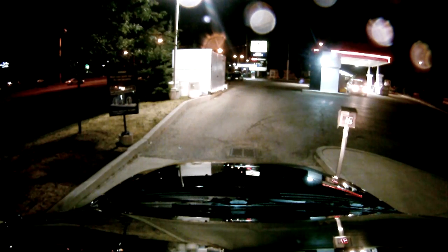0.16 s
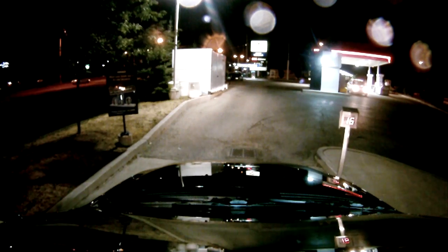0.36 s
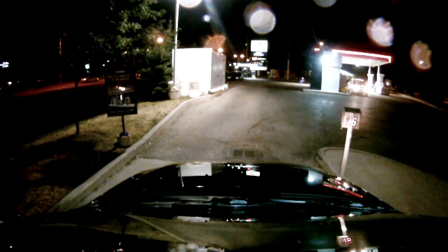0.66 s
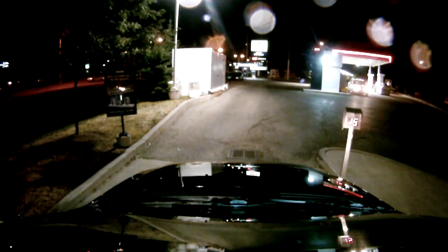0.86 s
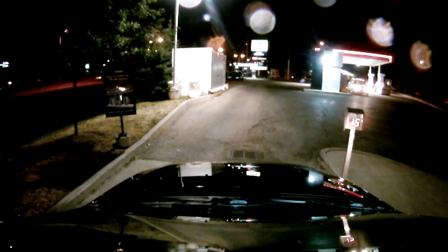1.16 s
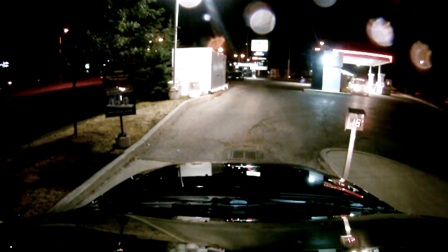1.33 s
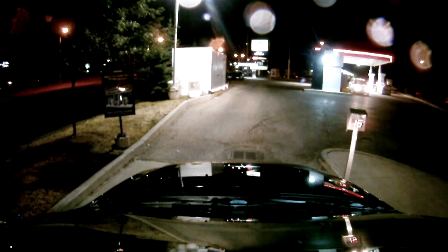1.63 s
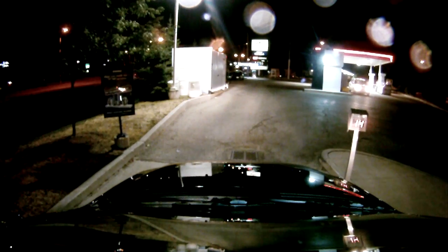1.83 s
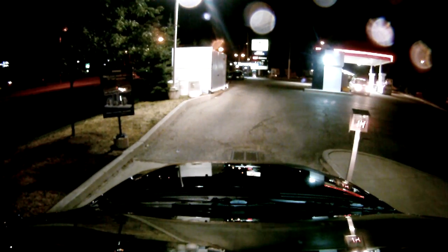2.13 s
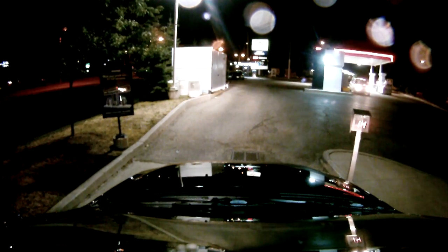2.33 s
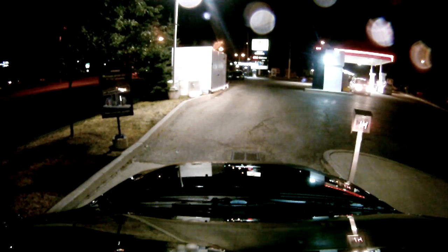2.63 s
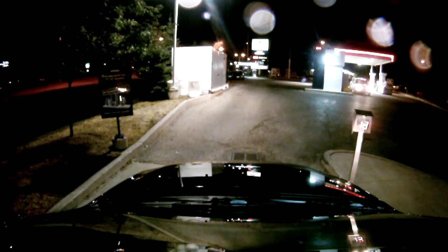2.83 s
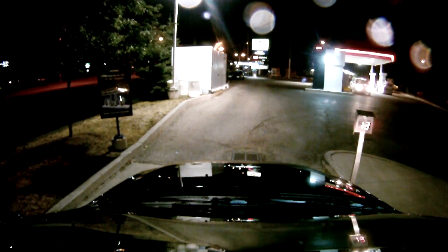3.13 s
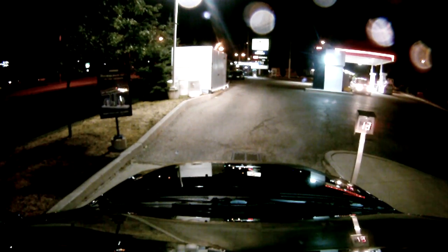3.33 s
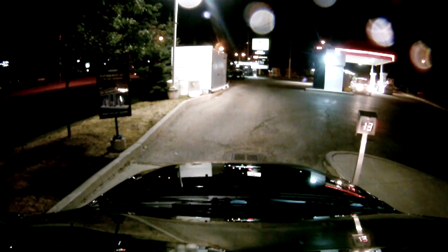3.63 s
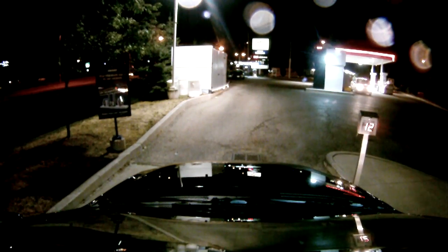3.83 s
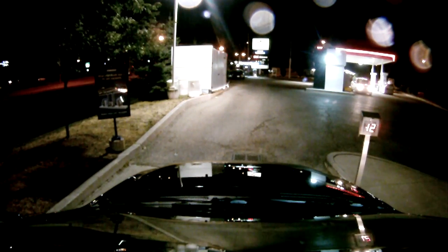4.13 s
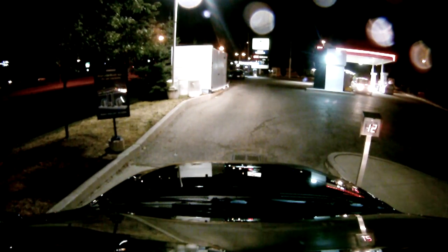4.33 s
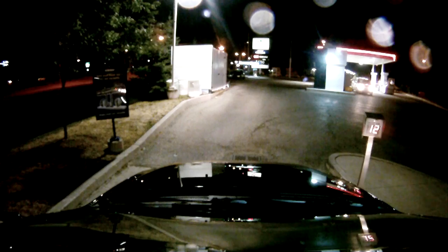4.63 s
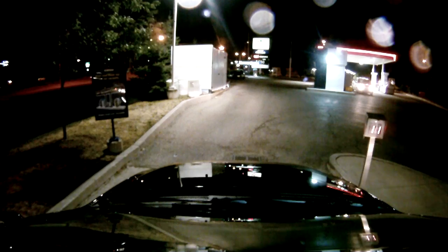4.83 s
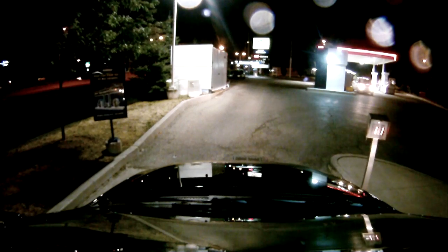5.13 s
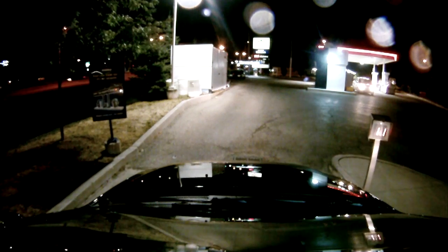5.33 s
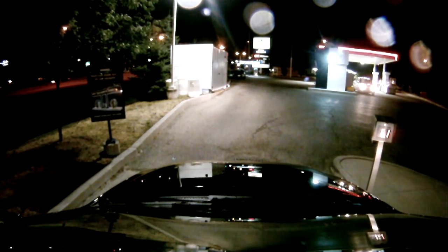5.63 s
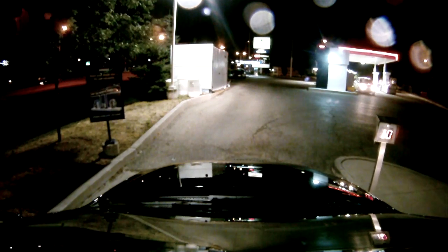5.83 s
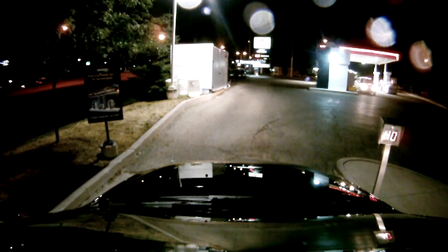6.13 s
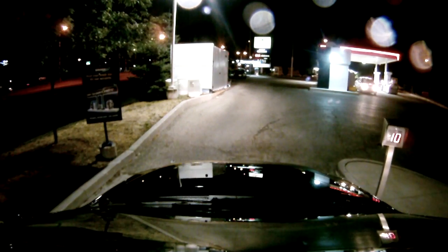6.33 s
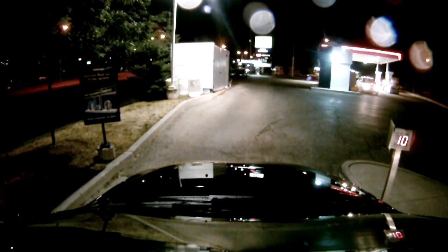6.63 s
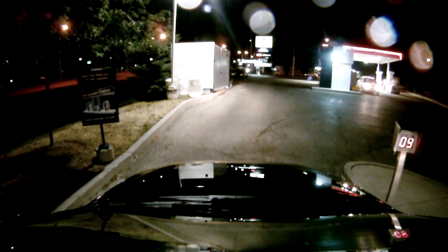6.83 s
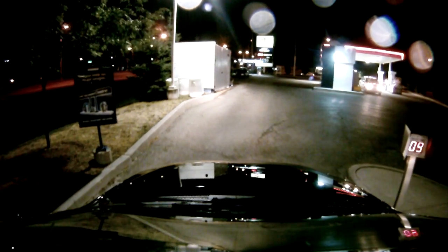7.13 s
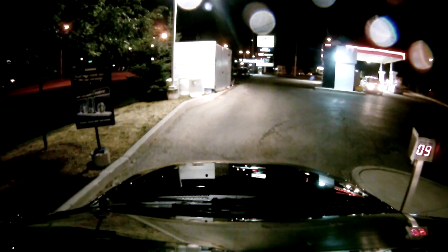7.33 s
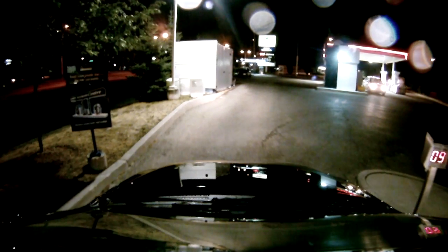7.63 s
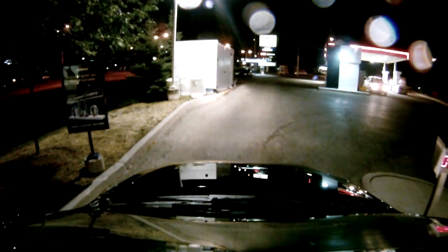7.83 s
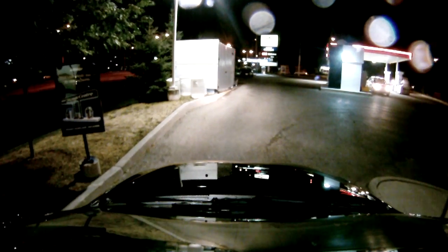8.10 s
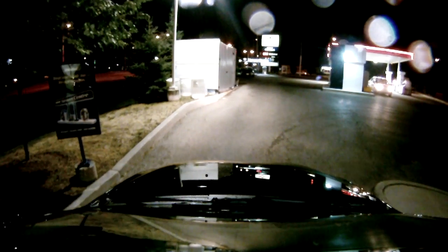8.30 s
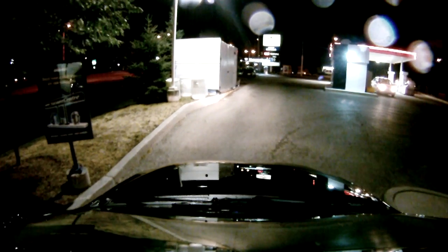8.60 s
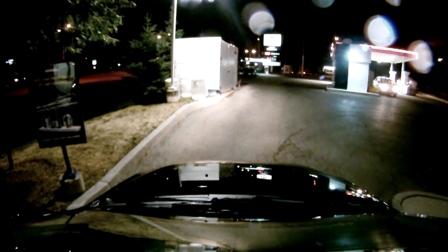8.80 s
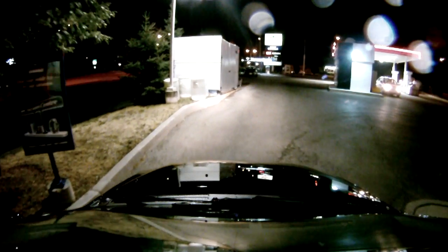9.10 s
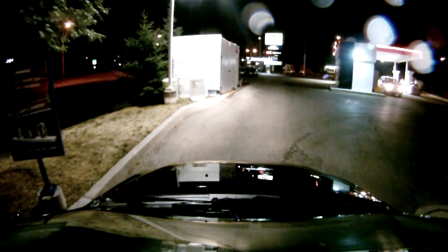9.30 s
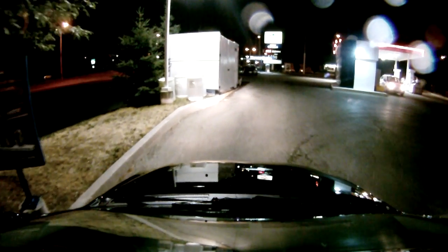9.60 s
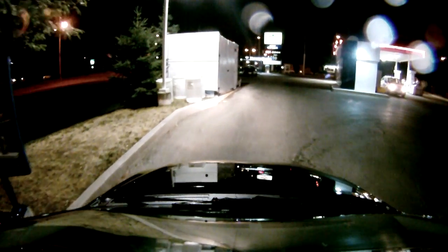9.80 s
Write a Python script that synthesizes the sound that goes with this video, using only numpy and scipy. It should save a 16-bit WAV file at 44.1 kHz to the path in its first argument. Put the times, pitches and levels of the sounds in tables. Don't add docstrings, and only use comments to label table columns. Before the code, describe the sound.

Powerful drying blowers roar with broad hiss and low panel booming as a car creeps out of a wash bay, the roar gradually fading.

```python
import sys
import numpy as np
from scipy import signal
from scipy.fft import rfft, irfft, next_fast_len
from scipy.io import wavfile
from scipy.ndimage import uniform_filter1d

SR = 44100
rng = np.random.default_rng(int(sys.argv[2]) if len(sys.argv) > 2 else 0)


def invert_db(x):
    u = np.asarray(x, float) / 20
    return 10 ** u


def wav_record(signal):
    frames = np.transpose(np.atleast_2d(signal))
    bounded = np.clip(frames, -1, 1)
    quanta = np.round(bounded * 32767).astype(np.int16)
    wavfile.write(sys.argv[1], SR, quanta)


N = 439236
T = np.arange(N) / SR
HZ = np.fft.rfftfreq(next_fast_len(N), 1 / SR)

# [t/s, level/dB]
JET_ROAR = [(0, -25.5), (.3, -26.5), (.5, -24.5), (.7, -26), (1, -26.5), (1.6, -27), (2.4, -27),
            (3.2, -27.5), (4.4, -28), (4.8, -28), (5.6, -28), (6.4, -28), (7.2, -29.5), (8, -30.5),
            (8.5, -31.5), (8.95, -32), (9.45, -36.5), (9.96, -41)]
# [f/Hz, level per Hz/dB]
GROWL_COLOUR = [(30, -26), (100, -12.5), (200, -5.5), (400, -8.5), (700, -5), (1000, -5.5), (1500, -1),
                (1850, 2.5), (2050, -20)]
ROAR_COLOUR = [(1700, -36), (1900, -8.5), (2100, 0), (2400, -3.5), (2700, -9), (2900, -9.5), (3400, -36)]
HISS_COLOUR = [(2000, -49), (2800, -9.5), (3300, 1.5), (4100, -2), (4500, -9), (5000, -42)]
HISS_EDGE_COLOUR = [(3900, -26), (4400, -6), (4800, -1), (5400, -7), (5800, -8.5), (6000, -15.5),
                    (6300, -46)]
# [f/Hz, waver/Hz, level under the growl/dB]
BLADE_TONES = [(586, 8, -20.5), (465, 25, -24), (1165, 35, -17)]

# [t/s, level under full/dB]
ROOF_FORCE = [
    (0, -1.5),
    (1, 0),
    (3.4, -1.5),
    (4.4, 0.5),
    (5, -4),
    (5.5, -6),
    (6.1, -12.5),
    (7.5, -12.5),
    (9, -16.5),
    (9.96, -15),
]
# [f/Hz, width/Hz, level/dB]
UPPER_MODES = [(167.1, 23, 2), (151.3, 9.5, -5.5), (183.2, 15, -5)]
LOWER_MODES = [(121.9, 14, -3), (107, 12.4, -10), (137.1, 6.9, -5.5)]
CABIN_MODES = [(52.6, 3.9, 9.5), (73.7, 12, 3), (86.3, 37, -7)]
# [t/s, level over the steady boom/dB]
UPPER_GUSTS = [(.22, 8.5), (.55, 4), (.72, 3), (1.05, 5), (1.33, 6.5), (1.77, 6.5), (1.94, 7), (2.19, 0),
               (2.37, 12.5), (2.91, 9), (3.22, 8), (3.58, 3), (3.96, 5.5), (4.41, 7), (4.95, 6.5), (5.1, 5),
               (5.66, 7), (6.15, 4), (6.55, 8), (6.99, -2), (7.18, 9), (7.82, 9), (8.51, 10), (8.84, 13.5),
               (9.62, 8)]
LOWER_GUSTS = [(.3, 4), (.61, 7), (1.05, 4.6), (1.83, 7), (2.19, 5), (2.33, 9), (3.13, 2.4), (3.38, 6.5),
               (4.05, 6), (4.49, 3), (6.18, 4.1), (6.6, 4.4), (6.99, 6.2), (8.45, 5.6), (8.85, 11),
               (9.04, 6), (9.65, 4)]
CABIN_GUSTS = [(.3, 3), (.6, -6), (1.08, 5), (1.33, 3), (1.6, 3), (1.83, 5), (2.02, 4), (2.3, 3), (2.7, 0),
               (3.02, 8.4), (3.4, 7.6), (3.75, -8), (3.92, 3), (4.2, -8), (4.43, 8), (5.2, 4), (5.4, 4),
               (5.57, 2), (8.25, 11), (8.85, 4), (9.57, 6)]
BOOM_DB = (-32.5, -34.5, -40.5)
# [t/s, factor]
BOOM_LAG = [
    (0, 1.),
    (0, 1.),
    (.45, 1.5),
]

# [t/s, firing rate f/Hz, level/dB]
IDLE = [
    (0, 30.5, -49),
    (4, 30.85, -49),
    (7.4, 31.9, -49),
    (7.7, 28.8, -54),
    (9.2, 30.7, -53),
    (9.4, 30.2, -52),
    (9.96, 30.7, -48),
]
# [multiple, level/dB]
IDLE_ORDERS = [(1, -3), (2, -14), (3, -11)]

# [f/Hz, level per Hz/dB]
TRAFFIC_COLOUR = [(150, -26), (230, -2.5), (300, -3.5), (450, 3.5), (600, -14), (900, -30)]

# [t/s, level/dB, rise/s, fall/s]
SPRAY_SHEETS = [
    (.465, -27.5, .025, 0.087),
    (.61, -28, .02, 0.038),
    (.68, -33, 0.022, .06),
    (.77, -32, 0.028, .06),
]

# [f/Hz, width/Hz, level/dB]
CASE_MODES = [(203, 8.7, -7), (272, 54, 4.5), (642, 25, -1.5), (770, 37, 4.5), (2460, 74, -3),
              (527, 69, -5), (573, 42, 1), (720, 87, -8.5), (1106, 106, 4), (1410, 430, -2),
              (1672, 410, 3.5), (1904, 138, -11), (2113, 146, 2), (2340, 125, 2.5), (2675, 120, 0.5),
              (2780, 123, -6.5), (3110, 106, 7), (3650, 130, -4), (4160, 670, 2.5), (4610, 100, 3)]


def curves(table):
    s, *columns = np.transpose(table)
    return [np.interp(T, s, column) for column in columns]


def unit(x):
    return x / np.sqrt(np.mean(x ** 2))


def shaped(x, gain):
    size = next_fast_len(N)
    return irfft(rfft(x, size) * gain, size)[:N]


def slope(points):
    hz, db = np.transpose(points)
    return invert_db(np.interp(np.log(HZ + 1), np.log(hz), db, left=-120, right=-120))


def coloured_noise(points):
    return unit(shaped(rng.standard_normal(N), slope(points)))


def bell(hz, width):
    return 1j * HZ * width / (hz ** 2 - HZ ** 2 + 1j * HZ * width)


def ring(modes):
    total = 0
    for hz, width, db in modes:
        total = total + invert_db(db) * shaped(rng.standard_normal(N), bell(hz, width) ** 2)
    return unit(total)


def walk(rate):
    k = int(SR / rate)
    steps = np.repeat(rng.standard_normal(N // k + 1), k)
    return 0.54 * uniform_filter1d(uniform_filter1d(steps, k), k)[:N]


def even(x, span_s):
    span = int(span_s * SR)
    power = uniform_filter1d(uniform_filter1d(x ** 2, span), span)
    return unit(x / np.sqrt(power + 0.061))


def swell(s, rise, fall):
    return np.exp(np.where(T < s, (T - s) / rise, (s - T) / fall))


def jets():
    roar_db, = curves(JET_ROAR)
    force_db, = curves(ROOF_FORCE)
    hiss_db = -5.5 + 0.14 * force_db
    growl_db = -3 + 0.19 * force_db
    growl = coloured_noise(GROWL_COLOUR) * invert_db(-0.04 * walk(9.2))
    roar = coloured_noise(ROAR_COLOUR) * invert_db(-0.04 * walk(9.2))

    flutter = invert_db(-0.4 * walk(60))
    low_hiss = unit(shaped(rng.standard_normal(N) * flutter, slope(HISS_COLOUR)))
    edge = unit(shaped(rng.standard_normal(N) * flutter, slope(HISS_EDGE_COLOUR)))
    edge_db = -6 + 0.17 * (roar_db - roar_db.max())
    hiss = low_hiss + invert_db(edge_db) * edge

    blades = 0
    for hz, waver, db in BLADE_TONES:
        blades = blades + invert_db(db) * even(ring([(hz, waver, 0)]), 0.12)
    return invert_db(roar_db) * (roar + invert_db(hiss_db) * hiss + invert_db(growl_db) * (growl + blades))


def roof():
    gust_rise_s, gust_fall_s, buffet_db = 0.024, 0.059, 1.0
    force_db, = curves(ROOF_FORCE)
    all_gusts = (UPPER_GUSTS, LOWER_GUSTS, CABIN_GUSTS)
    all_modes = (UPPER_MODES, LOWER_MODES, CABIN_MODES)
    out = 0
    for db, (early, slow), gusts, modes in zip(BOOM_DB, BOOM_LAG, all_gusts, all_modes):
        gust_db = sum(over_db * swell(s, slow * gust_rise_s, slow * gust_fall_s) for s, over_db in gusts)
        boom = even(ring(modes), 0.1)
        push_db = np.interp(T + early, T, force_db)
        out = out + invert_db(db + push_db + gust_db + buffet_db * walk(9)) * boom
    return out


def car():
    hz, level_db = curves(IDLE)
    phase = 2 * np.pi * np.cumsum(hz * (1 + 0.013 * walk(2.6))) / SR
    firing = sum(invert_db(db + 1.5 * walk(4)) * np.sin(k * phase) for k, db in IDLE_ORDERS)
    rock = invert_db(-62) + invert_db(-53) * swell(9.4, .1, .4)
    return np.sqrt(2) * invert_db(level_db) * firing + rock * ring([(18.5, 10, 0)])


def far_traffic():
    return invert_db(-57 + walk(0.72)) * coloured_noise(TRAFFIC_COLOUR)


def spray():
    sheets = sum(invert_db(db) * swell(s, rise, fall) for s, db, rise, fall in SPRAY_SHEETS)
    colour = [(800, -25), (1500, 0), (3000, -5.5), (5000, -6), (5900, -10), (6300, -40)]  # f/Hz, level/dB
    return sheets * coloured_noise(colour)


def scene():
    return (jets() + roof() + car() + far_traffic() + spray())[None]


def camera_case(x):
    case_db = sum(db * abs(bell(hz, width)) ** 2 for hz, width, db in CASE_MODES)
    return shaped(x, invert_db(case_db))


def sample_and_hold(x):
    slow = signal.resample_poly(x, 40, 147)
    return signal.resample_poly(np.repeat(slow, 4), 147, 160)[:N]


def low_pass(x):
    return signal.sosfilt(signal.butter(12, 15380, fs=SR, output="sos"), x)


def record(dry):
    held = sample_and_hold(camera_case(dry[0]))
    return low_pass(held[None])


dry = scene()
out = record(dry)
wav_record(out)
```